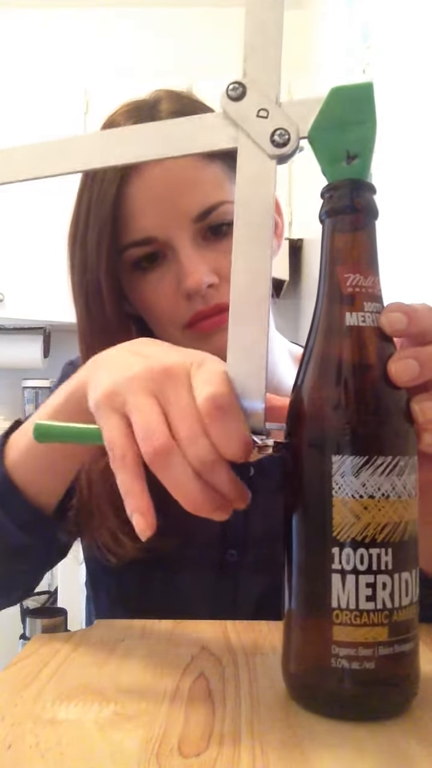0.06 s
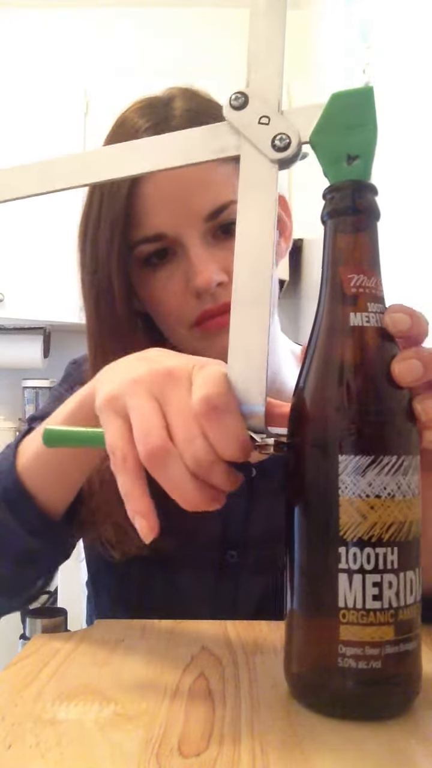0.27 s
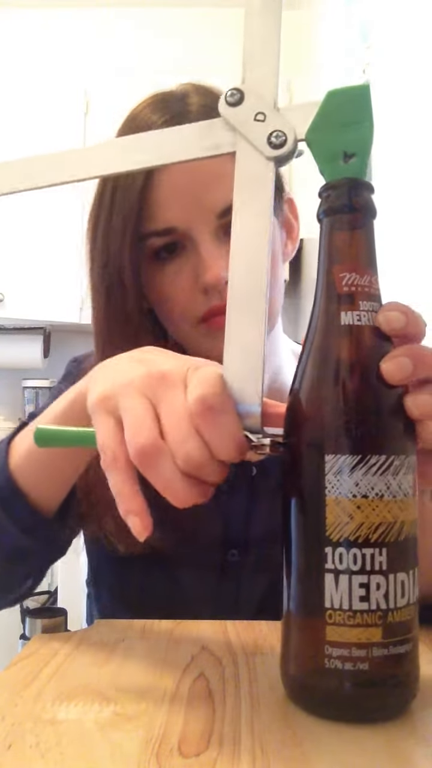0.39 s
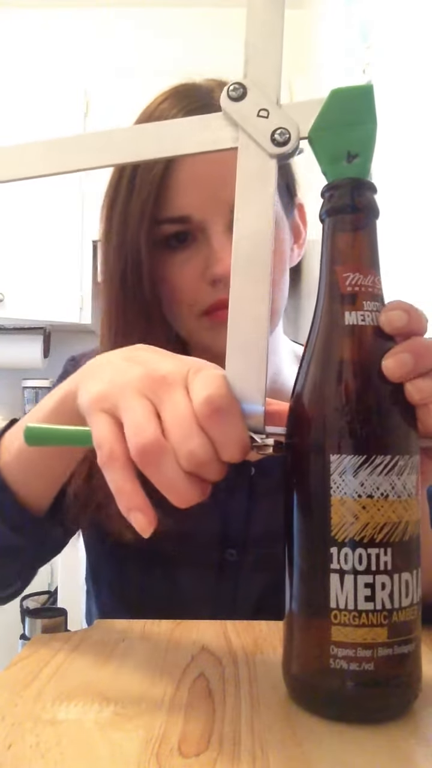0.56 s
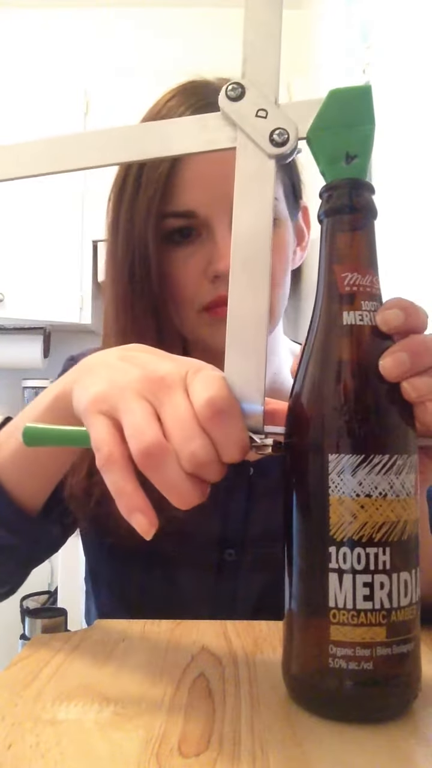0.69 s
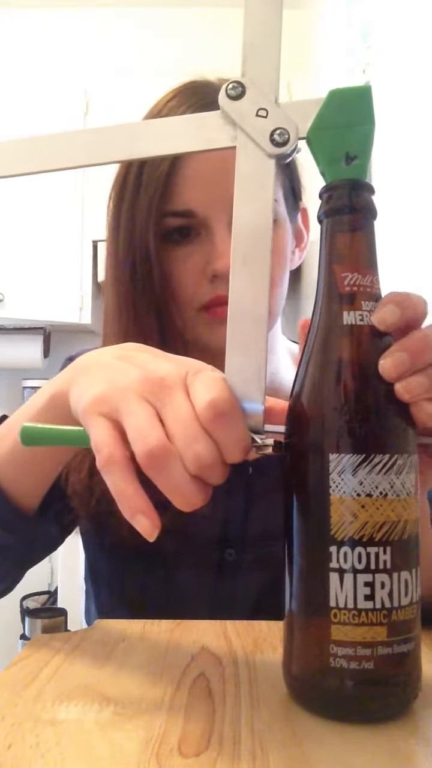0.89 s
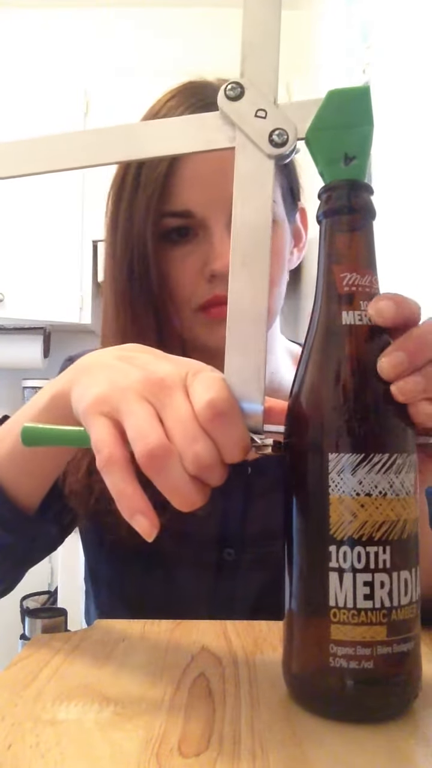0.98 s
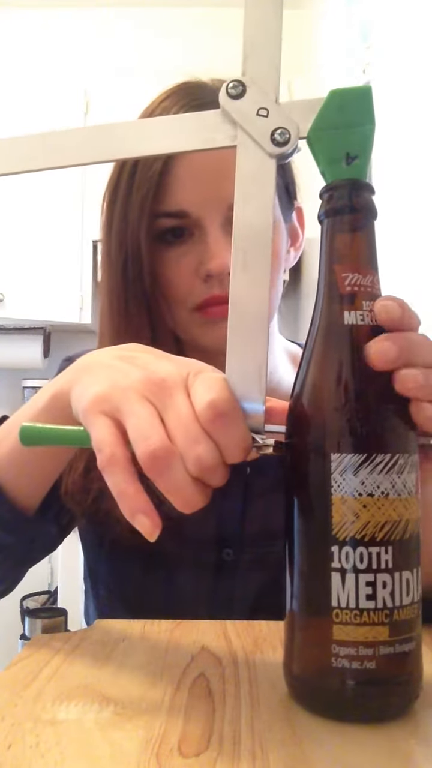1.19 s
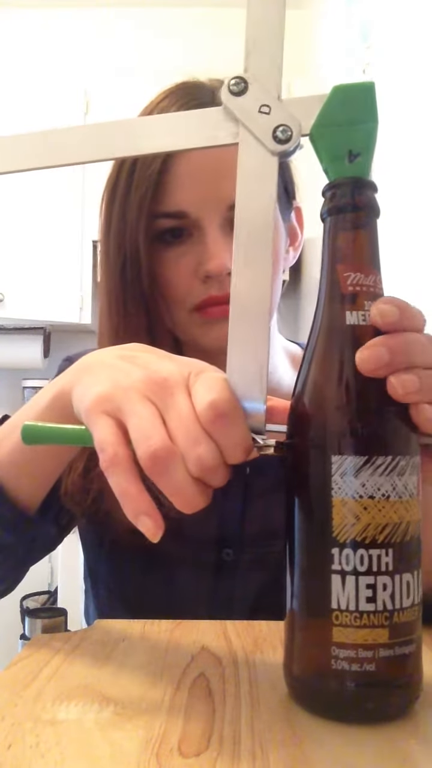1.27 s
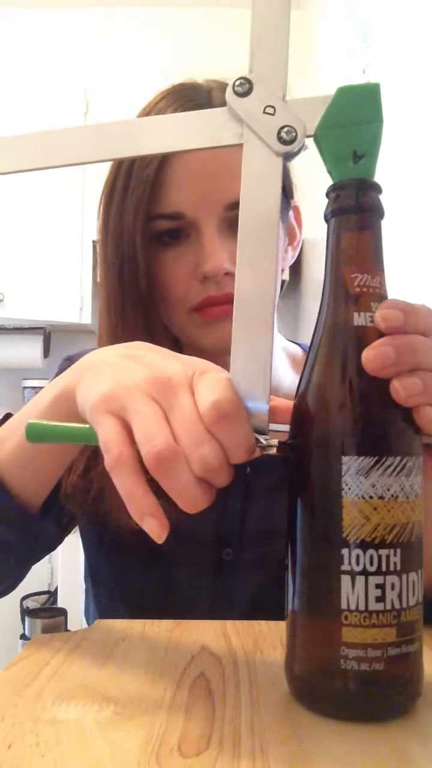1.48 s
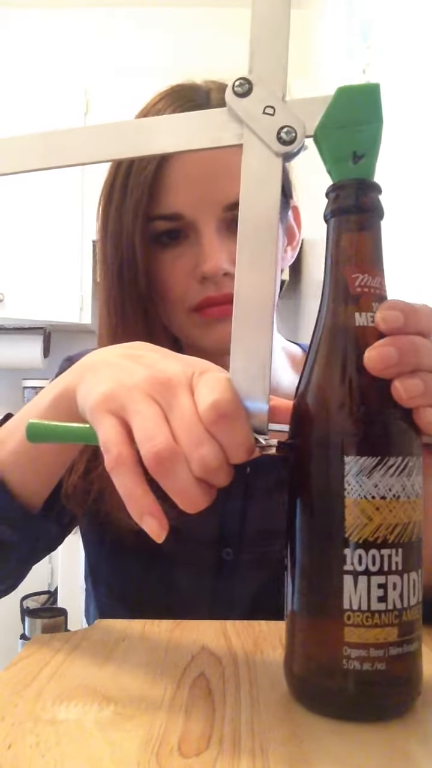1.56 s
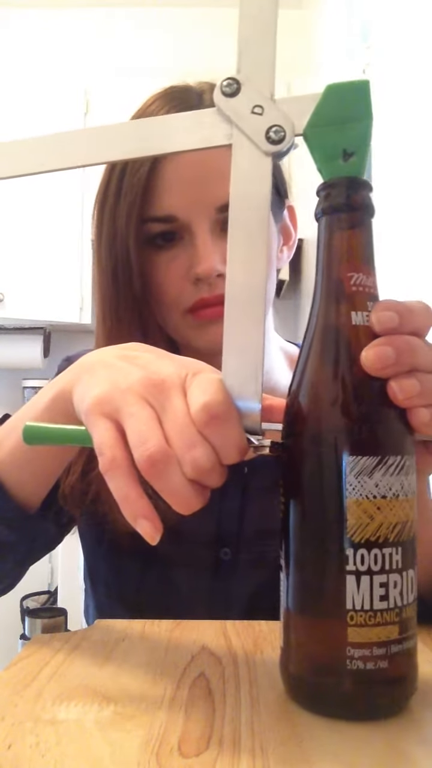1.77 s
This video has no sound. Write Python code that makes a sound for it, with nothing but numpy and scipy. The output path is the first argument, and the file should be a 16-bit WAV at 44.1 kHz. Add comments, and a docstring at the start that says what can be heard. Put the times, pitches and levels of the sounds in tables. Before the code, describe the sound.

Close up in a kitchen, a short rub leads into one hard, bright bottle clink with a short ring. Faint slides and ticks follow, then the wheel crackles sharply on the glass, above soft low hum.

```python
"""In a kitchen, close by, a glass bottle is turned by hand against the wheel of a bottle cutter.
The wheel scuffs and squeaks as filtered noise, then knocks one bright clink from the bottle's modes.
Light slides and sparse faint ticks surround a pause, then the wheel scores a run of sharp ticks:
each is a noise crack, ringing modes and a spray of splinter clicks, over a fine grit.
Echoes and a noise tail place the bottle in the room; low tones and noise make its hum and air."""
import sys
import numpy as np
from scipy import signal
from scipy.fft import rfft, irfft
from scipy.io import wavfile

SR = 44100
rng = np.random.default_rng(int(sys.argv[2]) if len(sys.argv) > 2 else 0)


def log_audio(samples):
    """Write samples as a 16-bit WAV file to the path given in sys.argv[1]."""
    # one column per channel
    frames = np.atleast_2d(samples).T
    # limit to full scale, then quantise
    limited = np.clip(frames, -1, 1)
    pcm = np.round(limited * 32767).astype(np.int16)
    wavfile.write(sys.argv[1], SR, pcm)


N = 79380
TIME = np.arange(N) / SR

# In the spectra below, level_db is a relative density per Hz.

# The bottle's modes, four matching lists: pitch_hz, knocked_db, chipped_db, t60_s
BOTTLE_PITCH_HZ = [2310, 3016, 3480, 3783, 3830, 3951, 4163, 4757, 5000, 5680, 6850, 7844, 7973, 8908, 9883,
                   9990, 10310, 10426, 12530, 14075, 15047]
BOTTLE_KNOCKED_DB = [-25, -19, -22, -11.5, -7, -0.5, -4, -11, -28, -25, -20, -8, -11, -13, -5, -23.5, -19.5,
                     -10.5, -23.5, -21, -18.5]
BOTTLE_CHIPPED_DB = [-23, -22, -28, -31.5, -39.5, -1, -23.5, -16.5, -17.5, -15, -15.5, -8, -15.5, -15,
                     -18.5, -6, -3.5, -18.5, -17, -15.5, -6.5]
BOTTLE_T60_S = [.036, .05, .035, .04, .03, 0.055, .024, .03, .03, .028, .05, .055, .055, .035, .052, .026,
                .026, .048, .035, .055, .036]
CONTACT_S = .00015  # time constant of every onset
MODE_SCATTER_DB = .5

# The knock of the wheel on the bottle
KNOCK_S, KNOCK_RING_DB, KNOCK_CRACK_DB, KNOCK_CRACK_T60_S = .2493, -12.5, -20, .033
# Pressure pulse of the first contact: gain and band of a filtered impulse
SNAP_DB, SNAP_LOW_HZ, SNAP_HIGH_HZ = -.5, 880, 3200
# The frame settles with a dull bump
REBOUND_S, REBOUND_HZ, REBOUND_DB, REBOUND_T60_S = .2715, 502, -38.5, .06
# Spectrum of the knock's crack: pitch_hz, level_db
KNOCK_CRACK_SPECTRUM = [(150, -21), (400, -20.5), (580, 9.5), (850, -14), (1200, 5), (1550, -10),
                        (2200, 2.5), (4500, 1), (6200, -16.5), (7600, 1), (10300, -5), (11300, -21),
                        (15000, -7)]
# The cutter's frame answering the knock: pitch_hz, level_db, t60_s
CUTTER_FRAME_MODES = [(524.2, -33, 0.09), (577, -39, 0.075), (622, -38, 0.13), (1180, -37.5, 0.05),
                      (1940, -27, 0.032)]
# Lightly damped modes that outlast the clink: pitch_hz, level_db, t60_s
LINGERING_MODES = [(3768, -45, .28), (3788, -44, .32), (7970, -62, .38), (10430, -55, .28)]
# Dense wash of weak resonances after the knock: pitch_hz, level_db
SHIMMER_SPECTRUM = [(1000, -21.5), (1800, -20.5), (2400, -12), (3450, -7.5), (3750, 7), (4000, 6.5),
                    (4250, -3), (4550, -7), (4800, -3), (5400, -18.5), (6300, -25.5), (7200, -7.5),
                    (7950, -2), (8400, -11.5), (8900, -7.5), (9400, -9), (10400, -0.5), (11300, -27),
                    (12500, -14), (14000, -13.5), (15000, -18.5)]
SHIMMER_DB, SHIMMER_LOW_T60_S, SHIMMER_HIGH_T60_S, SHIMMER_SPLIT_HZ = -32.5, .27, .2, 5500
CRACKLES_PER_S, CRACKLE_SPREAD_DB = 2500, 3.5

# Chips from the glass: start_s, ring_db, crack_db, tilt_db (per octave)
CHIPS = [(0.0677, -69, -67, 0), (0.2262, -56, -48, 10), (0.505, -83, -63, 7), (0.5102, -72, -64, -1.5),
         (1.1253, -71.5, -60, -6.5), (1.3654, -72.5, -79, 0), (1.3925, -73, -61, 9), (1.4264, -82, -72, 6),
         (1.5505, -48, -40, 6), (1.5884, -46, -46, 4), (1.6120, -54.5, -56, -18), (1.6330, -64.5, -74, 0),
         (1.667, -55.5, -78, 10), (1.6838, -53, -45, 6), (1.7142, -41, -47, 4), (1.7238, -44, -47, 8),
         (1.7470, -42, -36.5, 11), (1.776, -57.5, -62, 3), (1.7985, -44, -48, 4)]
# Spectrum of a chip's crack before its tilt: pitch_hz, level_db
CHIP_CRACK_SPECTRUM = [(800, -7), (2500, -1.5), (3400, -1.5), (3950, 5), (4400, 2.5), (5200, -2),
                       (5700, 1.5), (6300, -4), (6950, 7), (7400, -2.5), (8200, 8), (9200, 1), (10200, 4.5),
                       (11300, -6.5), (13500, 0), (15000, -3)]
CHIP_CRACK_T60_S, CHIP_DETUNE, CHIP_SCATTER_DB = .019, .005, 2
# Fine crunch of the rolling wheel
SCORE_START_S, GRITS_PER_S, GRIT_DB, GRIT_SPREAD_DB = 1.55, 7300, -71.5, 4
# Splinters after each chip, level against its ring
CRUMBS_PER_S, CRUMB_DB, CRUMB_T60_S = 3400, -17.5, .08
# Bending waves run slower at low pitch: delay scale, lag = DISPERSION_S * (sqrt(PIVOT_HZ / f) - 1) behind the
# pivot pitch, which also pivots the tilt
DISPERSION_S, PIVOT_HZ = .001, 7700

# Rubbing before the knock: time_s, level_db
SCUFF_ENVELOPE = [(.219, -80), (.2235, -50), (.229, -49), (.233, -52), (.243, -48.5), (.247, -44),
                  (.2485, -36), (.258, -80)]
# Spectrum of the rubbing: pitch_hz, level_db
SCUFF_SPECTRUM = [(200, -10), (400, -5.5), (600, 17.5), (900, -4), (1300, -4.5), (2600, -17), (3700, -4.5),
                  (5000, -17), (5600, -3.5), (6200, -19), (7300, -15.5), (8000, -5.5), (9000, -14.5),
                  (10200, -7.5), (11300, -19), (12600, -13), (15000, -13.5)]
# Short squeak of the skidding wheel; widths here and below reach from centre to half amplitude
SQUEAK_S, SQUEAK_LENGTH_S, SQUEAK_DB, SQUEAK_HZ, SQUEAK_WIDTH_HZ = .233, .017, -46.5, 3670, 200

# Light slides of the glass: start_s, length_s, hiss_db, singing_db
GLASS_SLIDES = [(0.032, .055, -94, -78.5), (0.191, 0.062, -73, -70.5), (0.95, 0.085, -74, -101),
                (1.347, .075, -84, -83)]
# Spectrum of the sliding hiss: pitch_hz, level_db
SLIDE_HISS_SPECTRUM = [(3000, -17.5), (7000, -6.5), (10000, 2), (12000, -7.5), (14000, 1)]
SING_HZ, SING_WIDTH_HZ = 3945, 60

LOW_CUT_HZ = 400  # high-pass that keeps the knock, ticks and rubbing free of low rumble
# The knock passed through to the table: pitch_hz, level_db, t60_s
TABLE_TOP_MODES = [(75, -50, .08), (148.4, -47.5, .28), (308, -56, .13)]

# Reverberation by band: pitch_hz, level_db (against the direct sound)
REVERB_LEVEL = [(200, -9.5), (600, -15), (2000, -20), (4000, -22), (8000, -24), (10000, -24), (15000, -19)]
# How long it rings in each band: pitch_hz, t60_s
REVERB_T60 = [(300, .28), (2000, .27), (4000, 0.21), (8000, 0.3), (11000, .16), (15000, 0.14)]
TAIL_DELAY_S = .011
ECHO_FIRST_S, ECHO_LAST_S, ECHO_DB = .007, .044, -17

# Tones of the room's hum: pitch_hz, level_db (rms), wavering (0-1)
HUM_TONES = [(91.36, -76, 0.6), (150, -60, 0.6), (175.5, -52, 0.7), (201, -61.5, 0.9), (276.2, -64.5, 0.7),
             (302.8, -65.5, 0.8), (353.4, -71, 0.2), (442, -66, 0.95), (822, -76, 0.89), (912, -76, .9),
             (1105, -82.5, 0.4)]
HUM_WAVER_HZ = 11
# Spectrum of the room's air: pitch_hz, level_db
AIR_SPECTRUM = [(15, -44.5), (25, -26), (55, -8.5), (85, -1), (115, -2.5), (165, 0.5), (235, -4.5),
                (300, -5.5), (480, -4.5), (680, -11), (920, -14), (1500, -21), (3000, -32), (5000, -40.5),
                (9000, -42.5), (15000, -45)]
AIR_DB = -58

CUTOFF_HZ = 15400


def knock():
    """A snap and a crack set bottle and frame ringing; a shimmer and lightly damped modes linger."""
    out = np.zeros(N)
    glass = ring(zip(BOTTLE_PITCH_HZ, BOTTLE_KNOCKED_DB, BOTTLE_T60_S))
    snap = band_pass(signal.unit_impulse(len(glass)), SNAP_LOW_HZ, SNAP_HIGH_HZ)
    frame = ring(CUTTER_FRAME_MODES)
    lingering = ring(LINGERING_MODES)
    crack = noise(KNOCK_CRACK_SPECTRUM) * decay(TIME, KNOCK_CRACK_T60_S)
    add(out, KNOCK_S, from_db(KNOCK_RING_DB) * glass + frame + lingering + from_db(SNAP_DB) * snap)
    add(out, KNOCK_S, from_db(KNOCK_CRACK_DB) * crack + shimmer())
    add(out, REBOUND_S, ring([(REBOUND_HZ, REBOUND_DB, REBOUND_T60_S)]))
    return out


def shimmer():
    """A grainy wash of weak resonances that dies sooner in the treble."""
    wash = grains(CRACKLES_PER_S, CRACKLE_SPREAD_DB, SHIMMER_SPECTRUM)
    low_pass = signal.butter(2, SHIMMER_SPLIT_HZ, fs=SR, output="sos")
    low = signal.sosfiltfilt(low_pass, wash)
    high = wash - low
    fading = low * decay(TIME, SHIMMER_LOW_T60_S) + high * decay(TIME, SHIMMER_HIGH_T60_S)
    return from_db(SHIMMER_DB) * fading


def scoring():
    """Each chip is a tiny crack, a ring and a spray of splinters; fine grit crunches in the final run."""
    out, spray_level = np.zeros(N), np.zeros(N)
    modes = list(zip(BOTTLE_PITCH_HZ, BOTTLE_CHIPPED_DB, BOTTLE_T60_S))
    crack_fall = decay(TIME, CHIP_CRACK_T60_S)
    spray_fall = decay(TIME, CRUMB_T60_S)
    for start_s, ring_db, crack_db, tilt_db in CHIPS:
        colour = [(hz, db + tilt_db * np.log2(hz / PIVOT_HZ)) for hz, db in CHIP_CRACK_SPECTRUM]
        add(out, start_s, from_db(ring_db) * ring(modes, CHIP_SCATTER_DB, CHIP_DETUNE))
        add(out, start_s, from_db(crack_db) * noise(colour) * crack_fall)
        add(spray_level, start_s, from_db(ring_db + CRUMB_DB) * spray_fall)
    grit = from_db(GRIT_DB) * grains(GRITS_PER_S, GRIT_SPREAD_DB, CHIP_CRACK_SPECTRUM)
    grit = grit * (TIME > SCORE_START_S)
    splinters = spray_level * grains(CRUMBS_PER_S, GRIT_SPREAD_DB, CHIP_CRACK_SPECTRUM)
    return out + grit + splinters


def disperse(x):
    """Bending waves: a chip's treble reaches the air first, its lower pitches a moment later."""
    size = 2 * N
    f = np.fft.rfftfreq(size, 1 / SR)
    # Phase whose delay, relative to the pivot pitch, grows as the pitch falls
    turns = DISPERSION_S * (2 * np.sqrt(f * PIVOT_HZ) - f)
    return irfft(rfft(x, size) * np.exp(-2j * np.pi * turns), size)[:N]


def scuff():
    """The wheel rubs as shaped noise, then skids with a squeak of narrow noise."""
    level_db = np.interp(TIME, *np.transpose(SCUFF_ENVELOPE), left=-np.inf, right=-np.inf)
    rub = from_db(level_db) * noise(SCUFF_SPECTRUM)
    squeak = swell(SQUEAK_S, SQUEAK_LENGTH_S) * narrow_noise(SQUEAK_HZ, SQUEAK_WIDTH_HZ)
    return rub + from_db(SQUEAK_DB) * squeak


def sliding():
    """Light rubbing swells and fades: a faint hiss, and the bottle's main mode sings."""
    hiss = noise(SLIDE_HISS_SPECTRUM)
    sing = narrow_noise(SING_HZ, SING_WIDTH_HZ)
    return sum(swell(start_s, length_s) * (from_db(hiss_db) * hiss + from_db(sing_db) * sing)
               for start_s, length_s, hiss_db, sing_db in GLASS_SLIDES)


def table():
    """The table top's low modes answer the knock with a soft thump."""
    out = np.zeros(N)
    add(out, KNOCK_S, ring(TABLE_TOP_MODES))
    return out


def room(x):
    """A scatter of early echoes, and a diffuse tail that dies at its own rate in each band."""
    t, response = TIME[:N // 3], np.zeros(N)
    edges = np.geomspace(150, 17000, 15)
    for low, high in zip(edges, edges[1:]):
        hz = np.sqrt(low * high)
        band = band_pass(rng.standard_normal(len(t)), low, high)
        fall = decay(t, at_hz(REVERB_T60, hz))
        level = from_db(at_hz(REVERB_LEVEL, hz))
        add(response, TAIL_DELAY_S, level * band * fall / np.linalg.norm(fall))
    delays = ECHO_FIRST_S + (ECHO_LAST_S - ECHO_FIRST_S) * rng.random(size=60)
    gains = rng.choice([-1, 1], len(delays)) / np.sqrt(delays)
    response[(delays * SR).astype(int)] += from_db(ECHO_DB) * gains / np.linalg.norm(gains)
    return signal.fftconvolve(x, response)[:N]


def hum():
    """Low tones, each part steady sine and part wavering narrow noise, over the air of the room."""
    out = from_db(AIR_DB) * noise(AIR_SPECTRUM)
    for hz, db, waver in HUM_TONES:
        steady = np.sqrt(2) * np.sin(2 * np.pi * (hz * TIME + rng.random()))
        wavering = narrow_noise(hz, HUM_WAVER_HZ)
        out = out + from_db(db) * (np.sqrt(1 - waver ** 2) * steady + waver * wavering)
    return out


def ring(modes, scatter_db=MODE_SCATTER_DB, detune=0):
    """Struck modes as decaying sines; strength, and pitch if detuned, vary with each blow."""
    t = TIME[:N // 4]
    out = np.zeros(len(t))
    for hz, db, t60 in modes:
        gain = from_db(db + rng.normal(0, scatter_db))
        pitch_hz = hz * (1 + rng.normal(0, detune))
        out += gain * np.sin(2 * np.pi * pitch_hz * t) * decay(t, t60)
    return out


def grains(per_s, spread_db, spectrum):
    """Random clicks of uneven size at an average rate, given a spectrum; rms 1."""
    sizes = from_db(spread_db * np.minimum(rng.exponential(1, N), 4)) * rng.choice([-1, 1], N)
    return coloured(sizes * (rng.random(N) < per_s / SR), spectrum)


def narrow_noise(hz, width_hz):
    """Noise through one narrow resonance; rms 1."""
    f = np.fft.rfftfreq(N, 1 / SR)
    resonance = 1 / (1 + ((f - hz) / width_hz) ** 2)
    return rms_one(irfft(rfft(rng.standard_normal(N)) * resonance, N))


def noise(spectrum):
    """Noise of a given spectrum; rms 1."""
    return coloured(rng.standard_normal(N), spectrum)


def coloured(x, spectrum):
    """Filter a signal by a spectrum; rms 1."""
    gain = from_db(at_hz(spectrum, np.fft.rfftfreq(N, 1 / SR)))
    return rms_one(irfft(rfft(x) * gain, N))


def band_pass(x, low_hz, high_hz):
    """Keep what lies between two pitches."""
    return signal.sosfilt(signal.butter(2, [low_hz, high_hz], "band", fs=SR, output="sos"), x)


def decay(t, t60):
    """Fast rise on contact, then an exponential fall of 60 dB in t60 seconds."""
    return (1 - np.exp(-t / CONTACT_S)) * np.exp(-np.log(1000) * t / t60)


def swell(start_s, length_s):
    """A smooth rise and fall, half a sine."""
    return np.sin(np.pi * np.clip((TIME - start_s) / length_s, 0, 1))


def add(out, start_s, sound):
    """Mix a sound in at a time."""
    i = min(int(start_s * SR), N - 1)
    out[i:i + len(sound)] += sound[:N - i]


def at_hz(points, hz):
    """Read a table on a log-frequency axis."""
    f, value = np.transpose(points)
    return np.interp(np.log(np.maximum(hz, 1)), np.log(f), value)


def rms_one(x):
    """Scale to unit rms."""
    return x / np.sqrt(np.mean(x ** 2) + 1e-20)


def from_db(db):
    """Decibels to gain."""
    return 10 ** (np.asarray(db) / 20)


def scene():
    """Cutter and bottle close by, the room and its hum behind."""
    bottle = scuff() + knock() + disperse(scoring()) + sliding()
    bottle = signal.sosfilt(signal.butter(2, LOW_CUT_HZ, "high", fs=SR, output="sos"), bottle)
    return (bottle + room(bottle) + table() + hum())[None]


def record(dry):
    """A steep low-pass cuts the top of the treble."""
    return signal.sosfilt(signal.ellip(10, .2, 80, CUTOFF_HZ, fs=SR, output="sos"), dry)


dry = scene()
out = record(dry)
log_audio(out)
```